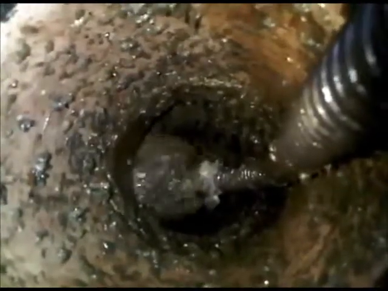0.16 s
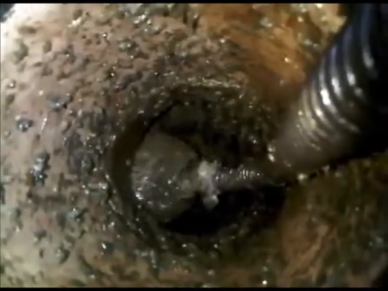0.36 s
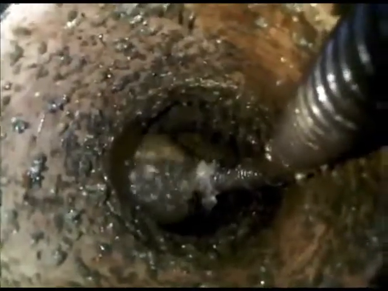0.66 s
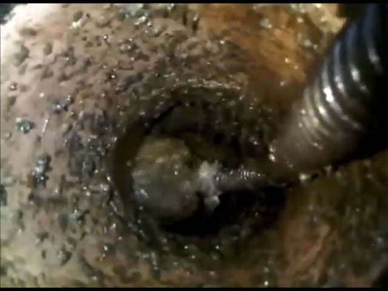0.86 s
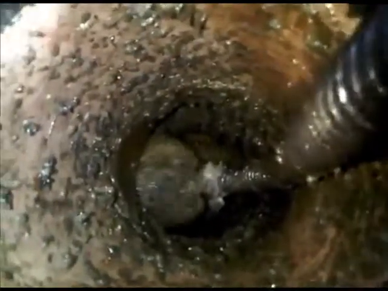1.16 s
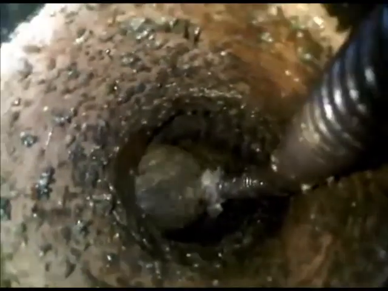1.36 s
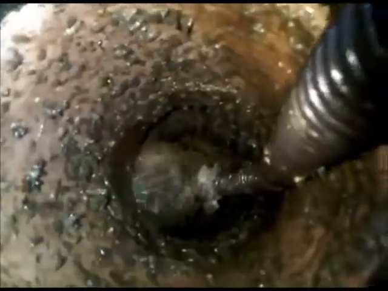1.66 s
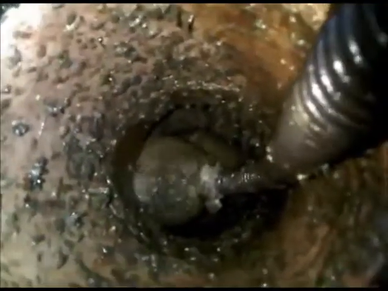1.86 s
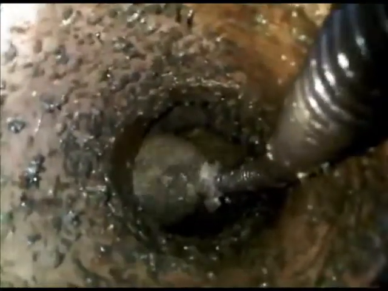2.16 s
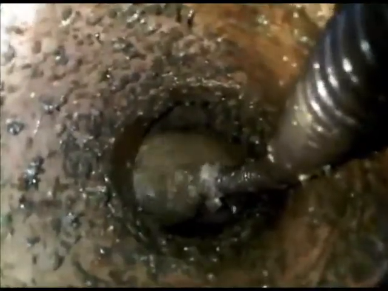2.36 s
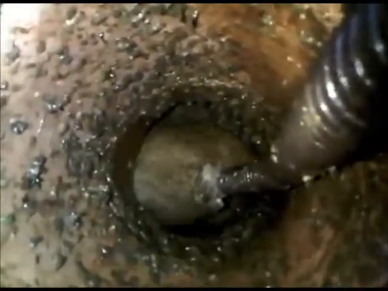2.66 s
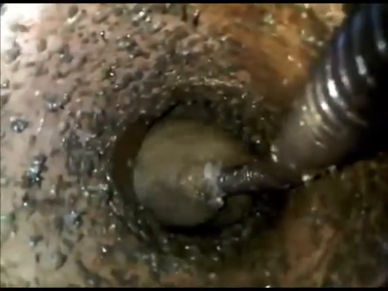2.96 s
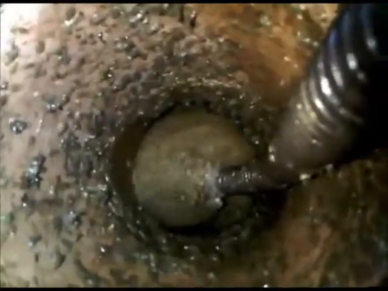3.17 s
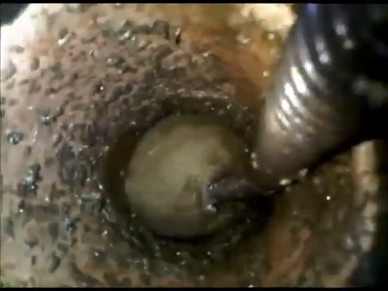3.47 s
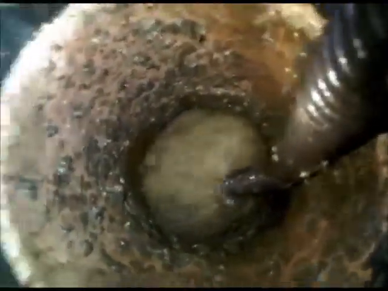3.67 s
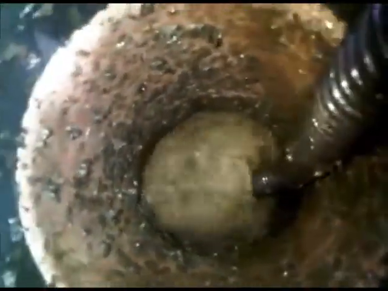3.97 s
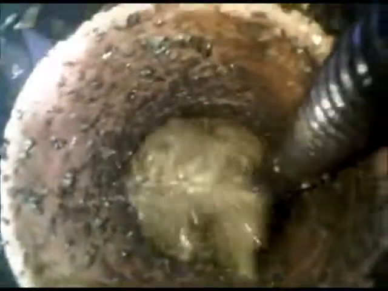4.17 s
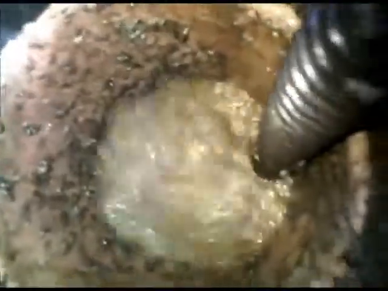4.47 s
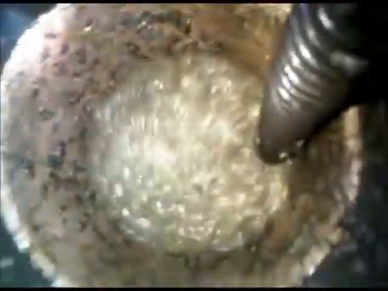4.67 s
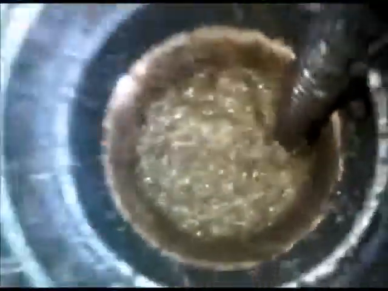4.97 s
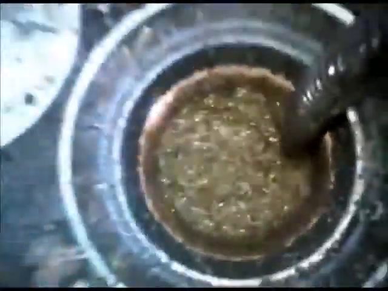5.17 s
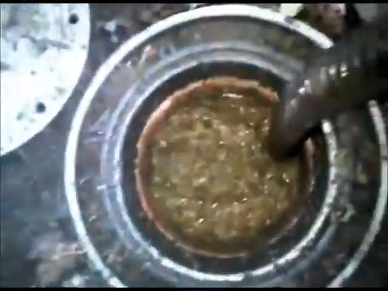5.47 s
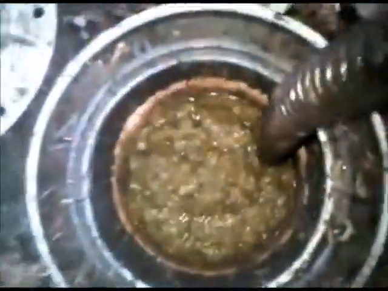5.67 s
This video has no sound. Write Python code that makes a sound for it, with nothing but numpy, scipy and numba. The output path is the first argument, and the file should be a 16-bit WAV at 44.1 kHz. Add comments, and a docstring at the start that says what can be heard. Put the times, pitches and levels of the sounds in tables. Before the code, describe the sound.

Quiet indoor hum with faint gritty crackle, light metallic ticks and small wet splats from a steel cable in a drain pipe. Soft bubbling begins midway, then a hard scrape and the loudest, deep glug. After a lull of gurgling and fizz, dense knocks, scrapes and glugs rise in pitch, then fade to near quiet. Close, narrow phone-like microphone, mono.

```python
"""A coiled steel cable works in a blocked drain pipe while dirty water climbs; a phone looks down the pipe.
Throughout, a quiet room of noise bands hums, the cable creeps in gritty crackles, and noise puffs ring as
light ticks and splats. From 2.5 s bubbling drives the air column; at 3.3 s a hard scrape meets the loudest
glug, a fading sine. Small bubbles fizz from 4 s; from 4.5 s come dense knocks, scrapes and glugs while the
shortening column rises in pitch. Past 5.4 s sliding tones squeak faintly over what remains."""
import sys
import numpy as np
from scipy import signal
from scipy.io import wavfile
from scipy.ndimage import uniform_filter1d
from numba import njit

SR = 44100
rng = np.random.default_rng(int(sys.argv[2]) if len(sys.argv) > 2 else 0)


def wav_record(signal):
    """Record a signal, one row per channel, as 16-bit PCM in the file named by sys.argv[1]."""
    frames = np.transpose(np.atleast_2d(signal))
    bounded = np.clip(frames, -1, 1)
    # unit amplitude maps onto the largest positive 16-bit level
    quanta = np.round(bounded * 32767).astype(np.int16)
    wavfile.write(sys.argv[1], SR, quanta)


N = 256662
T = np.arange(N) / SR

# Colour of the room tone. Each row: frequency in Hz, relative density in dB per Hz.
ROOM_COLOUR = [(15, -45), (25, -23), (71, 0), (101, 2.5), (172, -0.5), (716, -13.5), (1190, -19),
               (1550, -11.5), (2020, -13), (2700, -15), (3610, -23.5), (6760, -25), (8000, -47),
               (10400, -70), (17600, -120)]
# Resonance of the air column above the water. Each row: time in seconds, pitch in Hz.
AIR_COLUMN = [(0, 157), (3.3, 169.5), (3.8, 175), (4.5, 219), (4.8, 258), (5.0, 310), (5.25, 408),
              (5.82, 390)]
# Water bubbling under the column. Each row: time in seconds, first mode in dB, upper mode in dB re first.
GURGLE_LEVELS = [(2.5, -86, -1), (2.73, -68.5, -3), (2.8, -86, -17), (3.0, -66, -16), (3.3, -70.5, -2.5),
                 (3.459, -67, -19), (3.6, -67.5, 6.5), (3.9, -57, -5.5), (4.14, -70.5, 6),
                 (4.4, -70.5, 5.5), (4.53, -65, -11.5), (4.66, -58, -24), (4.75, -41, -14),
                 (4.82, -45.5, -19.5), (4.97, -75.5, -10), (5.109, -84, -12), (5.239, -49.5, -1),
                 (5.36, -80.5, -17), (5.5, -86, -3)]
# Small bubbles breaking at the rising surface: start in seconds, end in seconds, level in dB.
SURFACE_FIZZ = (4.0, 4.47, -68.5)
# Faint falling squeaks. Each row: start in seconds, length in seconds, start Hz, end Hz, level in dB.
SQUEAK_SLIDES = [(5.422, 0.065, 3500, 3120, -75), (5.46, 0.076, 2800, 2660, -75.5),
                 (5.627, 0.049, 3400, 2860, -73), (5.672, 0.032, 2850, 2670, -73)]
# Resonances of the pipe wall. Each row: centre in Hz, width in Hz, gain in dB.
PIPE_MODES = [(414, 82, 2.5), (793, 150, -7.5), (1023, 43, -2), (1330, 56, 3), (1610, 48, 5),
              (1766, 190, 2), (1978, 40, 6), (2142, 160, 1.5), (2382, 58, 1), (2701, 120, 3),
              (3150, 110, -7)]
# Resonances that colour the spray. Each row: centre in Hz, width in Hz, gain in dB.
SPRAY_MODES = [(4380, 320, 0), (5510, 390, 0), (6560, 840, -3.5), (7070, 200, -2)]
# Coils grinding on the wall. Each row: start in seconds, rise in seconds, hold in seconds,
# fade t60 in seconds, scrape in dB, spray in dB re scrape.
GRIND_STROKES = [(3.316, 0.0037, 0.0033, 0.051, -34.5, -36.5), (3.34, 0.0074, .012, 0.2, -50, -10.5),
                 (3.386, 0.0095, 0.0056, 0.034, -34, -10), (3.423, .004, 0.0049, 0.15, -60.5, -8),
                 (3.596, .008, .02, .05, -73, -5), (3.62, 0.0073, 0.067, 0.096, -49, -10),
                 (3.751, .003, .006, 0.091, -60, -10.5), (3.795, .003, .03, 0.015, -48.5, -19),
                 (3.861, 0.01, 0.01, 0.034, -52.5, -4.5), (3.933, 0.0032, .005, 0.037, -59.5, -11),
                 (4.483, .005, 0.0032, 0.048, -59, -8.5), (4.538, 0.013, 0.019, 0.16, -60, 3),
                 (4.573, 0.017, 0.054, 0.12, -68, -20), (4.669, 0.015, 0.12, 0.34, -57, -6),
                 (4.9, 0.012, 0.0046, 0.031, -50.5, -35), (4.932, 0.0054, 0.023, 0.22, -59, -7),
                 (4.994, 0.0037, 0.0044, 0.022, -52, -39), (5.18, 0.015, 0.026, 0.21, -52.5, -9.5),
                 (5.244, 0.0082, 0.047, .15, -60, -21), (5.354, 0.0034, 0.0094, 0.023, -73, -20)]
# Thin ticks of steel and spray. Each row: start in seconds, ping peak in dB, pitch in Hz.
STEEL_TICKS = [(0.0672, -55.5, 5200), (0.2274, -57, 6460), (0.4355, -49.5, 4200), (0.4575, -56, 4960),
               (0.5287, -50.5, 5000), (0.5904, -53, 4170), (0.6878, -50, 5190), (0.755, -49.5, 3883),
               (0.8929, -55.5, 6250), (1.058, -58, 5550), (1.4066, -68, 5100), (1.4655, -61.5, 5430),
               (2.2777, -59, 5590), (2.8406, -62, 3800), (2.8823, -60, 4260), (3.2252, -53, 6000),
               (3.3187, -44, 6400), (3.3478, -44.5, 6380), (3.3898, -48, 4540), (3.4428, -49, 5500),
               (3.4945, -56, 4470), (3.5216, -56, 5500), (3.5972, -60, 5560), (3.625, -44.5, 6200),
               (3.6394, -38, 5380), (3.6601, -45, 5460), (3.6795, -34.5, 5840), (3.7407, -38, 5600),
               (3.779, -44, 4560), (3.8195, -38.5, 5850), (3.8711, -58, 4370), (3.92, -60, 4870),
               (3.9376, -57, 5800), (3.977, -62, 5630), (4.1474, -58.5, 4270), (4.4854, -43, 5100),
               (4.5493, -50, 5470), (4.5616, -41.5, 5040), (4.6744, -50.5, 4000), (4.711, -56, 6700),
               (4.7337, -53, 4430), (4.752, -42, 4480), (4.7716, -54, 3840), (4.795, -44, 4250),
               (4.8282, -48, 4130), (4.8414, -39.5, 4000), (4.9107, -42, 4200), (4.9356, -48.5, 4320),
               (5.0004, -47.5, 5400), (5.197, -42, 6150), (5.237, -50, 5400), (5.38, -60, 3700)]
# Air pockets bursting low in the pipe. Each row: start in seconds, nominal peak in dB, pitch in Hz,
# t60 in seconds.
AIR_POCKETS = [(1.062, -57, 148, 0.081), (1.29, -57, 372, 0.058), (1.704, -54, 151, 0.037),
               (1.891, -50.5, 156, 0.046), (2.216, -50.5, 424, 0.05), (2.371, -54.5, 152, 0.069),
               (2.536, -55.5, 155, 0.066), (2.999, -54, 163, 0.26), (3.071, -47.5, 159, 0.058),
               (3.138, -52.5, 157, 0.072), (3.225, -55, 177, .052), (3.321, -14, 166.5, 0.1),
               (3.392, -30.5, 169, 0.11), (3.528, -56, 182, 0.065), (3.627, -33, 177, 0.058),
               (3.659, -38, 182, 0.051), (3.794, -30.5, 190, 0.072), (3.87, -44, 186, 0.045),
               (4.084, -43.5, 195, 0.032), (4.243, -45, 212, 0.043), (4.548, -32.5, 256, 0.048),
               (4.588, -42, 265, .06), (4.612, -42, 272, 0.072), (4.642, -29, 252, 0.034),
               (4.689, -30, 278, .045), (4.709, -37, 262, 0.055), (4.736, -23.5, 265, 0.024),
               (4.759, -27, 315.4, 0.083), (4.779, -22, 226, 0.037), (4.819, -37, 302, 0.058),
               (4.845, -31.5, 327, 0.056), (4.944, -37.5, 340, 0.04), (4.963, -31.5, 341, 0.042),
               (5.134, -49, 197, 0.076), (5.201, -37, 442, .05), (5.215, -36.5, 353, 0.045),
               (5.235, -45, 457, 0.051), (5.264, -39, 440, 0.065)]
# What the pipe shakes: pitch in Hz, level in dB re a glug of the same pitch, t60 in seconds.
PIPE_MOUNTING = (103, 16.4, 0.24)
# Knocks of the coil and wet splats. Each row: start in seconds, cavity peak in dB, starting pitch in Hz,
# t60 of the exciting puff in seconds.
WET_KNOCKS = [(0.067, -49, 1820, 0.02), (0.098, -60, 1590, 0.018), (0.121, -53.5, 1360, 0.027),
              (0.157, -54.5, 1520, .025), (0.258, -55.5, 2730, 0.031), (0.451, -51, 1970, 0.048),
              (0.496, -55, 2180, 0.039), (0.535, -55, 1150, .03), (0.557, -55, 1270, 0.017),
              (0.57, -44, 2620, 0.029), (0.592, -47, 1730, 0.022), (0.665, -58, 620, 0.049),
              (0.751, -46, 1540, 0.02), (0.861, -58, 1710, .037), (0.889, -53.5, 2960, .05),
              (0.892, -49.5, 1280, 0.073), (0.916, -50.5, 1380, 0.018), (1.063, -52.5, 1500, 0.05),
              (1.1, -59, 1130, 0.025), (1.223, -57, 1720, 0.018), (1.406, -50.5, 2850, 0.017),
              (1.416, -49.5, 1640, 0.067), (1.528, -49.5, 2410, 0.019), (1.796, -59, 2730, .025),
              (1.875, -53, 1780, 0.023), (2.112, -57.5, 1500, 0.012), (2.131, -57.5, 3020, 0.016),
              (2.238, -55.5, 659, .017), (2.366, -52, 1440, 0.012), (2.47, -57, 1170, 0.02),
              (2.532, -55, 1230, 0.067), (2.552, -51, 1360, 0.01), (2.587, -52.5, 1130, 0.01),
              (2.73, -55.5, 684, 0.018), (2.998, -53.5, 1230, 0.024), (3.028, -52.5, 2720, .01),
              (3.118, -54, 990, .015), (3.127, -51, 1470, 0.018), (3.162, -53.5, 1540, 0.014),
              (3.233, -54, 1620, .025), (3.246, -52.5, 725, 0.023), (3.319, -26.5, 1017, .03),
              (3.32, -32, 1625, 0.055), (3.348, -31, 2330, .04), (3.36, -37.5, 1640, .04),
              (3.399, -30, 2100, .03), (3.39, -31, 1610, .05), (3.429, -46.5, 700, .032),
              (3.481, -49.5, 2680, 0.031), (3.523, -56, 1540, 0.051), (3.633, -37, 1314, 0.031),
              (3.66, -54, 1960, .02), (3.671, -33.5, 2060, 0.049), (3.74, -41, 2030, .015),
              (3.771, -53, 1510, .025), (3.7, -44, 990, .03), (3.797, -34, 1950, .03),
              (3.808, -40.5, 990, .02), (3.823, -40.5, 740, 0.023), (3.869, -45, 1970, 0.066),
              (3.936, -56, 700, 0.02), (3.975, -50.5, 1970, 0.013), (4.035, -53, 583, 0.0076),
              (4.088, -51.5, 810, 0.02), (4.134, -47.5, 815, .025), (4.182, -56.5, 826, 0.026),
              (4.214, -50, 770, 0.019), (4.238, -49.5, 1660, 0.017), (4.258, -51.5, 740, 0.015),
              (4.285, -50.5, 1680, .023), (4.298, -51, 740, 0.011), (4.359, -54.5, 1640, 0.014),
              (4.396, -52, 1370, 0.045), (4.487, -35.5, 1200, 0.015), (4.551, -41.5, 2710, 0.022),
              (4.562, -38.5, 747, 0.016), (4.621, -50, 1440, .025), (4.681, -42.5, 1950, .04),
              (4.719, -43.5, 850, 0.019), (4.734, -36, 1860, 0.026), (4.771, -32, 1750, .05),
              (4.797, -35, 2580, 0.031), (4.845, -40, 2790, 0.076), (4.909, -35, 1360, 0.033),
              (4.939, -40.5, 2700, 0.021), (4.946, -42, 2260, 0.015), (5.001, -29.5, 2130, 0.0096),
              (5.006, -38.5, 1350, 0.021), (5.053, -49.5, 1840, .025), (5.068, -53, 1310, 0.029),
              (5.196, -37.5, 2700, 0.095), (5.229, -37.5, 1280, 0.015), (5.251, -35, 1840, 0.016),
              (5.265, -37.5, 1360, 0.027), (5.292, -45.5, 1350, 0.06), (5.304, -46.5, 3040, 0.026),
              (5.344, -46.5, 1540, 0.028), (5.356, -43, 1580, 0.0055), (5.381, -51, 2170, 0.011),
              (5.722, -56, 2450, 0.018)]

ROOM_DB, HISS_DB = -70.5, -93
MIC_HZ, TOP_HZ = 7510, 15550
CREEP_DB, CREEP_SPRAY_DB = -79.5, -6.5  # the second is relative to the crackle
STIR_DB = -7  # bubbles stirred into the upper mode by a stroke, re its scrape
WALL_DB = 2.5  # pipe wall re cavity
TICK_T60_S, FRINGE_DB = 0.03, -16  # puff decay; spray fringe re ping


def undb(db):
    """Decibels to linear gain."""
    return 10 ** (np.asarray(db) / 20)


def level(x, db):
    """Set the rms level in dB."""
    return x * undb(db) / np.sqrt(np.mean(x ** 2))


@njit
def svf(x, hz, width):
    """State-variable band-pass whose centre may move; gain 1 at the centre."""
    y, b, l = np.empty(len(x)), 0., 0.  # output, band state, low state
    for i in range(len(x)):
        g, k = np.tan(np.pi * hz[i] / SR), width / hz[i]
        v = (b + g * (x[i] - l)) / (1 + g * (g + k))
        b, l, y[i] = 2 * v - b, l + 2 * g * v, k * v
    return y


def band(x, hz, width_hz):
    """One resonance, with a fixed or moving centre."""
    return svf(x, hz + np.zeros(len(x)), 1. * width_hz)


def body(x, modes):
    """A set of resonances of alternating sign, fed by one excitation."""
    out = np.zeros(len(x))
    for k, (hz, width_hz, db) in enumerate(modes):
        out += (-1) ** k * undb(db) * band(x, hz, width_hz)
    return out


def walk(rate):
    """Random levels held 1 / rate s and slewed twice; spread near 1."""
    hold = int(SR / rate)
    steps = np.repeat(rng.standard_normal(N // hold + 1), hold)
    return 1.31 * uniform_filter1d(uniform_filter1d(steps, hold), hold)[:N]


def add(out, s, sound):
    """Mix a sound in at s seconds."""
    i = int(s * SR)
    out[i:i + len(sound)] += sound[:N - i]


def puff(hz, t60, sharp, glide):
    """A short puff of noise, and the upward-gliding ring that it starts in a small cavity (peak 1)."""
    t = np.arange(4096) / SR
    envelope = (1 - np.exp(-t / 0.00017)) * 1000. ** (-t / t60)
    air = envelope * rng.standard_normal(len(t))
    ring = band(air, np.minimum(hz * (1 + glide * t), 9000), hz / sharp)
    return air, ring / np.abs(ring).max()


def grit(rate, scatter_db, smear_s):
    """Dense contacts of uneven size, each a short puff of noise; rms 1."""
    size = undb(scatter_db * np.minimum(rng.exponential(size=N), 3))
    hits = (rng.random(N) < rate / SR) * size
    puffs = signal.lfilter([1], [1, -np.exp(-1 / (smear_s * SR))], hits)
    return level(puffs * rng.standard_normal(N), 0)


@njit
def pops(start, hz, size, fall, glide, n):
    """Fading sine grains that rise in pitch."""
    y = np.zeros(n + 4096)
    for k in range(len(hz)):
        # z is the spinning phasor, p its step, turn the gradual quickening of that step
        z, p = size[k] + 0j, fall[k] * np.exp(2j * np.pi * hz[k] / SR)
        turn = np.exp(1j * glide * (1 - fall[k]) * hz[k] / SR)
        for i in range(min(int(5 / (1 - fall[k])), 4096)):
            z, p = z * p, p * turn
            y[start[k] + i] += z.imag
    return y[:n]


def bubbles(rate, low_hz, high_hz, cycles, scatter_db):
    """Random bubbles of many pitches, each fading over a set number of cycles; rms 1."""
    when, pitch, strength = rng.random((int(rate * N / SR), 3)).T
    hz = low_hz * (high_hz / low_hz) ** pitch
    size = undb(scatter_db * np.minimum(-np.log(1 - strength), 3))
    fall = np.exp(-hz / cycles / SR)
    return level(pops((when * N).astype(np.int64), hz, size, fall, 0.14, N), 0)


def rasp(rate, scatter_db):
    """Grit between coil and wall rings the pipe, wet films burst; and the spray that they spit."""
    wall = level(body(grit(rate, scatter_db, 0.002), PIPE_MODES), 0)
    films = bubbles(0.65 * rate, 900, 3400, 9.0, scatter_db)
    mist = level(body(grit(rate, scatter_db, 0.0029), SPRAY_MODES), 0)
    droplets = bubbles(0.32 * rate, 3700, 7400, 7.8, scatter_db)
    return wall + undb(-4.0) * films, mist + undb(-9.5) * droplets


def strokes():
    """Force of the cable on the wall, and the share that sprays: a swelling rise, hold, fade."""
    push, mist = np.zeros((2, N))
    for s, rise, hold, fade, db, spray_db in GRIND_STROKES:
        swell = np.clip((T - s) / rise, 0, 1) ** 2
        after = np.maximum(T - s - rise - hold, 0)
        shape = undb(db) * swell * 1000. ** (-after / fade)
        push += shape
        mist += undb(spray_db) * shape
    return push, mist


def room():
    """Third-octave bands of noise that swell together and flicker alone."""
    out, swell = np.zeros(N), walk(2.2)
    hz_points, db_points = np.transpose(ROOM_COLOUR)
    for hz in 30 * 2 ** (np.arange(25) / 3):
        db = np.interp(np.log(hz), np.log(hz_points), db_points) + 0.27 * swell + 1.7 * walk(23)
        noise = band(rng.standard_normal(N), hz, hz / 3)
        out += undb(db) * band(noise, hz, hz / 3)
    return level(out, ROOM_DB)


def creep():
    """The cable never rests quite still: sparse contacts crackle and spit with a wandering level."""
    crackle, spit = rasp(110, 2.6)
    spray_gain = undb(CREEP_SPRAY_DB + 2.0 * walk(20))
    return undb(CREEP_DB + 3.63 * walk(7.8)) * (crackle + spray_gain * spit)


def squeaks():
    """Thin wavering tones that slide down."""
    out = np.zeros(N)
    for s, length, start_hz, end_hz, db in SQUEAK_SLIDES:
        n = int(length * SR)
        waver = 1 + 0.015 * uniform_filter1d(rng.standard_normal(n), 40)
        hz = np.linspace(start_hz, end_hz, n) * waver
        tone = np.sin(2 * np.pi * np.cumsum(hz) / SR)
        add(out, s, undb(db) * np.hanning(n) * tone)
    return out


def fizz():
    """A run of small rounded bubble blips."""
    start, end, db = SURFACE_FIZZ
    blips = bubbles(150, 1300, 2400, 7, 3)
    fade = np.interp(T, [start, start + 0.13, end - .05, end], [0, 1, 1, 0])
    return undb(db) * fade * blips


def gurgle():
    """Bubbling drives the first and third modes of the air column, a tube closed by the water."""
    s, first_db, upper_db = np.transpose(GURGLE_LEVELS)
    hz = np.interp(T, *np.transpose(AIR_COLUMN))
    drive = grit(500, 2.9, 0.0032)
    first = band(band(drive, hz, 130), 0.65 * hz, 170)
    first = level(band(first, hz, 300), 0)
    third = level(band(band(drive, 3 * hz, 160), 700, 660), 0)
    blips = level(band(bubbles(120, 500, 2000, 5, 3), 650, 900), 0)
    upper = level(third + undb(1.5) * blips, 0)
    gate = undb(np.interp(T, s, first_db, left=-120, right=-120))
    bubbling = gate * (first + undb(np.interp(T, s, upper_db)) * upper)
    push, _ = strokes()
    return bubbling + undb(STIR_DB) * push * upper


def ticks():
    """Noise puffs ring as high pings with a wider fringe of spray."""
    ping, fringe = np.zeros((2, N))
    for s, db, hz in STEEL_TICKS:
        air, ring = puff(hz, TICK_T60_S, sharp=7.2, glide=2.3)
        add(ping, s, undb(db) * ring)
        add(fringe, s, undb(db) * air)
    return ping + undb(FRINGE_DB) * body(fringe, SPRAY_MODES)


def glugs():
    """A soft push starts a fading ring of trapped air; the deepest shake the mounting, lower and longer."""
    out, t = np.zeros(N), np.arange(12288) / SR
    low_hz, low_db, low_t60 = PIPE_MOUNTING
    shake = np.sin(2 * np.pi * low_hz * t) * 1000. ** (-t / low_t60)
    attack = 1 - np.exp(-t / 0.0025)
    for s, db, hz, t60 in AIR_POCKETS:
        air = np.sin(2 * np.pi * hz * t) * 1000. ** (-t / t60)
        mount = undb(low_db - 0.5 * abs(hz - low_hz)) * shake
        add(out, s, undb(db) * attack * (air + mount))
    cut = signal.butter(2, 70, "high", fs=SR, output="sos")
    return signal.sosfilt(cut, signal.sosfilt(cut, out))  # the glugs keep no deep bass below about 70 Hz


def scrape():
    """Dense rasping and spray while the cable is pushed along the wall."""
    push, mist = strokes()
    rub, spray = rasp(1300, 2.5)
    return push * rub + mist * spray


def splats():
    """Each contact rings its own wet cavity, which closes a little as it rings, and the pipe wall."""
    cavity, wall = np.zeros((2, N))
    for s, db, hz, t60 in WET_KNOCKS:
        air, ring = puff(hz, t60, sharp=9.6, glide=1.1)
        add(cavity, s, undb(db) * ring)
        add(wall, s, undb(db) * air)
    return cavity + undb(WALL_DB) * body(wall, PIPE_MODES)


def scene():
    """Layer the room, the water and the working cable into one channel."""
    background = room() + creep() + squeaks()
    water = fizz() + gurgle() + glugs()
    cable = ticks() + scrape() + splats()
    return (background + water + cable)[None]


def record(dry):
    """A narrow microphone channel, a trace of converter hiss, and the top cut."""
    narrow = signal.sosfilt(signal.cheby1(10, .5, MIC_HZ, fs=SR, output="sos"), dry)
    hiss = undb(HISS_DB) * rng.standard_normal(dry.shape)
    top_cut = signal.ellip(8, .2, 70, TOP_HZ, fs=SR, output="sos")
    return signal.sosfilt(top_cut, narrow + hiss)


dry = scene()
out = record(dry)
wav_record(out)
```